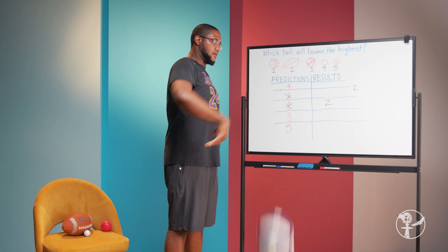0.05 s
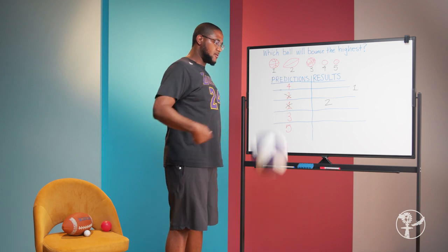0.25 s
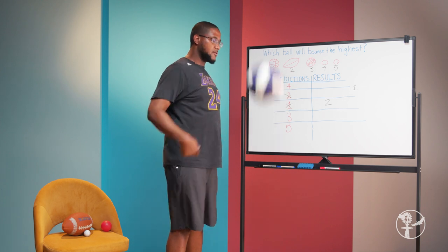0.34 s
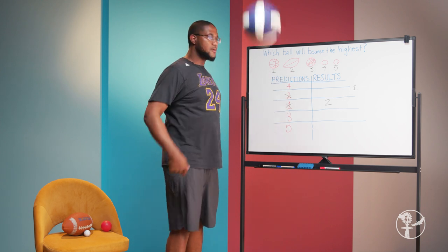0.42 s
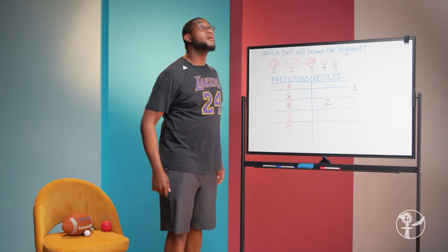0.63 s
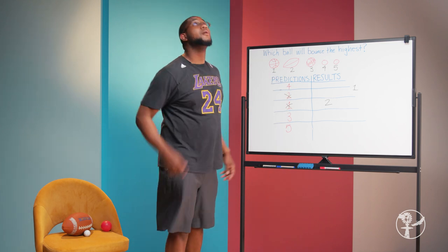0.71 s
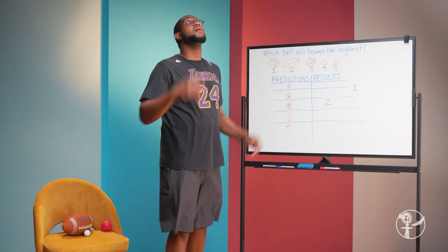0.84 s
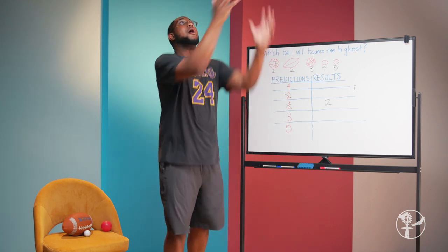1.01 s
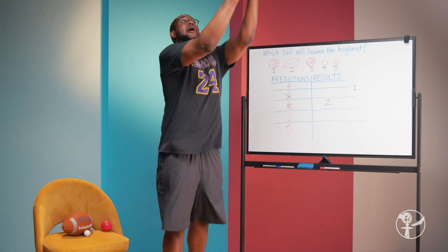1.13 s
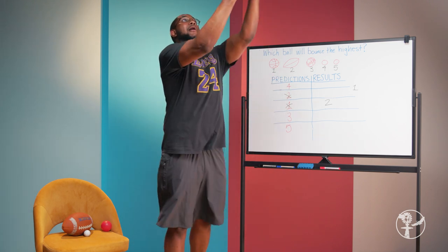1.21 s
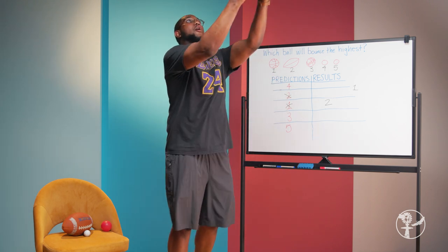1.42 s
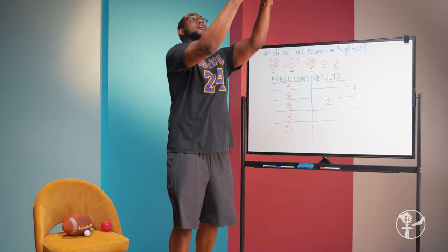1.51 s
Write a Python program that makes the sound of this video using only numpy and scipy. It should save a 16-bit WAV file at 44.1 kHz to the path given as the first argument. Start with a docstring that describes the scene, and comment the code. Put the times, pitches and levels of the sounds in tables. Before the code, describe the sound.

Hard ball bounce with a sharp crack and boomy tail, followed by close clothing rustle and bumps

```python
"""In a large room, a ball is thrown hard onto the floor: a crack, a short hollow thump, then a boomy tail.
The crack and thump are short sine tones; the tail is ringing low tones plus noise dying band by band.
A microphone clipped to a shirt also hears the cloth rustle, snap and bump as the arms move: shaped
grains and noise, clicks and low knocks. Something small and metallic rings faintly: wavering sine tones."""
import sys
import numpy as np
from scipy import signal
from scipy.fft import rfft, irfft
from scipy.io import wavfile

SR = 44100
rng = np.random.default_rng(int(sys.argv[2]) if len(sys.argv) > 2 else 0)


def unload_wav(signal):
    """Save mono or channel-first audio to the path in sys.argv[1] as 16-bit WAV at rate SR, clipped to [-1, 1]."""
    wavfile.write(
        sys.argv[1],
        SR,
        np.round(np.clip(np.atleast_2d(signal).T, -1, 1) * 32767).astype(np.int16),
    )


N = 68355  # length of the scene [samples]
CRACK_S = .2450  # moment the ball hits the floor [s]


def amp(db):
    """Turn decibels into a gain."""
    return 10 ** (np.asarray(db) / 20)


def rms_one(x):
    """Scale a signal to an rms (average strength) of 1."""
    return x / np.sqrt(np.mean(x ** 2) + 1e-20)


def at_hz(points, hz):
    """Read a table of (frequency, value) between its points, on a log-frequency axis."""
    points = np.array(points)
    return np.interp(np.log(hz), np.log(points[:, 0]), points[:, 1])


def since(s):
    """Seconds passed after a moment, zero before it."""
    return np.maximum(np.arange(N) / SR - s, 0)


def band(x, low_hz, high_hz):
    """Keep only the sound between two frequencies."""
    edges = [low_hz, min(high_hz, .45 * SR)]
    return signal.sosfilt(signal.butter(2, edges, "band", fs=SR, output="sos"), x)


def coloured(x, spectrum):
    """Give noise or grains a spectrum, at rms 1."""
    hz = np.maximum(np.fft.rfftfreq(N, 1 / SR), 1)
    return rms_one(irfft(rfft(x) * amp(at_hz(spectrum, hz)), N))


def arch(s, length):
    """A half-sine envelope: up and down again once."""
    return np.sin(np.pi * np.minimum(since(s) / length, 1))


def tone(hz, s):
    """A sine tone that starts at a moment."""
    return np.sin(2 * np.pi * hz * since(s))


def fibres():
    """Cloth fibres catching on each other: dense random clicks of uneven size."""
    per_second, spread_db = 14000, 2.5
    sizes = amp(spread_db * np.minimum(rng.exponential(1, N), 5))
    signs = rng.choice([-1, 1], N)
    happens = rng.random(N) < per_second / SR
    return rms_one(sizes * signs * happens)


def background_noise():
    """A faint steady noise under everything: random noise with a fixed spectrum."""
    # background spectrum, relative: (frequency [Hz], level [dB])
    noise_spectrum = [(15, -38), (25, -28), (161, -10), (335, -23), (607, -35.5), (863, -28), (2550, -37.5),
                      (5430, -35.5), (7510, -45), (11600, -36.5), (16000, -48.5)]
    level_db = -60
    return amp(level_db) * coloured(rng.standard_normal(N), noise_spectrum)


def rustle():
    """Fibres rubbing: hiss, body and rumble follow the movement of the cloth."""
    # movements of the cloth: (time [s], hiss level [dB], body level [dB], rumble level [dB])
    movements = [
        [(0.0, -69.5, -72, -59.5), (0.11, -47.5, -53.5, -47), (0.17, -57, -76, -53), (0.24, -68.5, -84.5, -68)],
        [(0.9, -77, -80, -74), (1.018, -53.5, -71.5, -44.5), (1.078, -46, -52.5, -41.5),
         (1.14, -43, -48.5, -36.5), (1.198, -47, -31.5, -36.5), (1.248, -46.5, -38, -40),
         (1.296, -39.5, -40, -40), (1.388, -53, -42.5, -43), (1.436, -47.5, -45.5, -47.5),
         (1.55, -62.5, -63.5, -68)],
    ]
    # faint hiss of cloth while the ball is in the air: (time [s], level [dB])
    faint_hiss = [(0.24, -71), (0.3, -73), (0.58, -74.5), (0.9, -76.5)]
    # spectrum of the hiss, relative: (frequency [Hz], level per Hz [dB])
    hiss_spectrum = [(1470, -52), (2500, -34), (2770, -27), (3600, -16.5), (5350, -7), (7360, -12.5),
                     (11700, -11), (16000, -23.5)]
    # spectrum of the body, relative: (frequency [Hz], level per Hz [dB])
    body_spectrum = [(180, -48), (300, 0), (467, 4), (545, -2.5), (1120, 5.5), (1320, 2), (1430, 4.5),
                     (2230, -5), (3500, -7), (4550, -36), (7700, -120)]
    hiss = coloured(fibres(), hiss_spectrum)
    body = coloured(fibres(), body_spectrum)
    rumble = rms_one(band(rng.standard_normal(N), 35, 220))
    out, clock = 0, np.arange(N) / SR
    for rows in [*movements, faint_hiss]:
        times, *levels = np.transpose(rows)
        # the faint hiss has one level column, so it uses the first layer only
        for level_db, layer in zip(levels, [hiss, body, rumble]):
            # outside its times a movement is too soft to hear
            out = out + amp(np.interp(clock, times, level_db, left=-120, right=-120)) * layer
    return out


def scuffs():
    """Cloth scuffing across the microphone: bursts of grainy noise that swell, hold, then die."""
    # scuffs: (start [s], rise [s], hold [s], time to fall 60 dB [s], level [dB],
    #          low edge [Hz], high edge [Hz])
    scuff_list = [(0.048, 0.0022, 0.014, 0.36, -41.5, 3240, 15500),
                  (.065, 0.0013, 0.041, 0.22, -49.5, 490, 2800), (.051, .010, .003, .012, -37, 3500, 14000),
                  (.106, .004, .004, .012, -35, 3000, 11000),
                  (1.050, 0.0018, 0.0038, 0.02, -44, 1550, 12500),
                  (1.051, 0.00067, 0.0048, 0.071, -44, 524, 1240),
                  (1.114, 0.002, 0.0021, 0.077, -43, 800, 14300),
                  (1.155, 0.005, 0.0069, 0.074, -31, 2310, 12700),
                  (1.158, 0.0019, 0.0051, 0.052, -28, 650, 1725),
                  (1.169, 0.0028, 0.009, 0.24, -35.5, 2310, 14100),
                  (1.2255, .003, .002, .015, -27, 1500, 9000), (1.2352, .0003, .001, .02, -25, 3000, 15000),
                  (1.2415, .002, .002, .025, -30, 2200, 9000), (1.279, .003, .004, .012, -19, 4500, 15000),
                  (1.280, .002, .005, .012, -21, 3250, 3950), (1.282, .002, .003, .015, -22, 400, 2500),
                  (1.290, .001, .003, .025, -24, 1200, 5500), (1.290, .001, .003, .04, -25, 3250, 3950),
                  (1.306, .004, .003, .05, -34, 2200, 4500), (1.339, .001, .004, .035, -32, 1200, 4200),
                  (1.339, .001, .01, .08, -42, 6500, 9000), (1.289, .003, .02, .1, -39, 6500, 8500),
                  (1.352, 0.0042, 0.0059, 0.03, -45, 251, 610),
                  (1.465, 0.0063, 0.0097, 0.14, -46.5, 3540, 14800)]
    grains = fibres() + 1.44 * rng.standard_normal(N)
    out = 0
    for s, rise, hold, t60, db, low_hz, high_hz in scuff_list:
        swell = np.minimum(since(s) / rise, 1) ** 2
        fade = amp(db - 60 * since(s + rise + hold) / t60)
        # filtered twice for steeper edges
        burst = band(band(grains, low_hz, high_hz), low_hz, high_hz)
        out = out + swell * fade * rms_one(burst)
    return out


def ticks():
    """A seam or button ticking: one click with a short noisy wake, through its own band."""
    # ticks: (time [s], peak level [dB], low edge [Hz], high edge [Hz])
    tick_list = [(.0455, -21, 2800, 16000), (.0645, -23, 500, 3200), (.0777, -24, 600, 4500),
                 (.1128, -24, 3000, 9000), (.292, -46, 6000, 14000), (.507, -46, 2500, 12000),
                 (.770, -45, 1500, 13000), (1.2354, -12, 1500, 15000)]
    wake_t60_s = 0.0031  # time for the wake to fall 60 dB
    noise, out = rng.standard_normal(N), 0
    for s, db, low_hz, high_hz in tick_list:
        wake = noise * (since(s) > 0) * amp(-60 * since(s) / wake_t60_s)
        click = 0.083 * wake + 1e-18
        click[int(s * SR)] = 1
        click = band(band(click, low_hz, high_hz), low_hz, high_hz)
        out = out + amp(db) * click / np.abs(click).max()
    return out


def bumps():
    """Bumps on the microphone body: low tones that start softly and die quickly."""
    # bumps: (time [s], level [dB], pitch [Hz], time to fall 60 dB [s])
    bump_list = [(0.116, -35.5, 102, .1), (1.024, -33, 129, 0.073), (1.049, -17.5, 68.3, 0.079),
                 (1.085, -29, 95, .1), (1.123, -22.5, 89, 0.076), (1.16, -20.5, 249.5, 0.073),
                 (1.174, -27, 135, 0.049), (1.237, -15, 111, 0.036), (1.253, -25.5, 64, 0.16),
                 (1.286, -12, 216, 0.028), (1.318, -29, 106, 0.22), (1.355, -16, 185, 0.029),
                 (1.41, -14, 103, 0.033)]
    out = 0
    for s, db, hz, t60 in bump_list:
        soft_start = np.minimum(since(s) * hz * 2, 1)  # lasts half a cycle
        out = out + amp(db - 60 * since(s) / t60) * soft_start * tone(hz, s)
    return out


def squeaks():
    """Cloth squeaking: noise in narrow bands, swelling and fading once."""
    # squeaks: (start [s], length [s], pitch [Hz], level [dB])
    squeak_list = [(1.18, .05, 1090, -33), (1.405, .035, 950, -43), (1.225, .02, 2000, -36),
                   (1.29, .025, 2020, -39), (1.33, .045, 1080, -42)]
    width_hz = 130
    white, out = rng.standard_normal(N), 0
    for s, length, hz, db in squeak_list:
        squeak = rms_one(band(white, hz - width_hz / 2, hz + width_hz / 2))
        out = out + amp(db) * arch(s, length) * squeak
    return out


def metal_rings():
    """Something small and metallic ringing: thin sine tones of wavering strength."""
    # rings: (start [s], length [s], pitch [Hz], level [dB])
    ring_list = [(.37, .022, 3260, -50), (.45, .115, 3250, -66), (1.285, .125, 5170, -45),
                 (1.4, .06, 5170, -54), (1.33, .09, 5400, -51), (1.49, .06, 5170, -60),
                 (1.288, .06, 7150, -47), (1.338, .03, 8550, -53), (1.335, .03, 7500, -53)]
    waver = 1 + .35 * rms_one(band(rng.standard_normal(N), 15, 90))
    out = 0
    for s, length, hz, db in ring_list:
        out = out + amp(db) * arch(s, length) ** .5 * waver * tone(hz, s)
    return out


def room_modes():
    """The bounce sets the room ringing at its own pitches; the low ones build up a little later."""
    # room modes: (pitch [Hz], level [dB], time to fall 60 dB [s])
    mode_list = [(72.2, -29.5, 1.0), (100.83, -5, 0.44), (107.7, -15, 1.12), (125.5, -17.5, 0.83),
                 (138.85, -6, .7), (154.2, -21, 0.96), (165.6, -16, 1.143), (193.5, -18, 1),
                 (204.5, -14.5, 0.23), (246, -22, 0.73), (269, -17.5, 0.66), (328, -44, .6),
                 (449, -31, 0.72), (463, -24, 0.57), (569, -26, 0.2), (738.5, -26, 0.51),
                 (843, -36.5, 0.69), (1022, -47.5, 0.24)]
    build_s, build_delay_s, delayed_below_hz = .018, .028, 400
    waver_depth = .3
    t = since(CRACK_S)
    build = 1 - np.exp(-since(CRACK_S + build_delay_s) / build_s)
    out = 0
    for hz, db, t60 in mode_list:
        waver = 1 + waver_depth * rms_one(band(rng.standard_normal(N), 2, 12))
        start = build if hz < delayed_below_hz else 1
        out = out + start * waver * amp(db - 60 * t / t60) * tone(hz, CRACK_S)
    return out


def diffuse_tail():
    """Blurred echoes of the bounce: noise dying band by band, the lows rising more slowly."""
    # tail spectrum, relative: (frequency [Hz], level per Hz [dB])
    tail_spectrum = [(50, -34), (80, -16), (110, -27), (150, -3), (200, -18.5), (286, -13.5), (385, -32.5),
                     (452, -22.5), (750, -23.5), (1130, -25.5), (1700, -28.5), (2100, -35), (2500, -44),
                     (3300, -42.5), (5200, -51), (7500, -71.5), (12000, -68.5)]
    # how long the tail lasts: (frequency [Hz], time to fall 60 dB [s])
    tail_decay = [(60, 2.2), (160, 0.82), (420, 0.55), (1100, 0.42), (2910, 0.24), (7680, 0.15)]
    level_db = -26.5  # strength averaged from the start of the scene to 0.1 s after the hit, silence before the hit included
    rise_s, extra_rise_at_150_hz_s = 0.00067, 0.029
    hold_s = 0.14  # the fall starts gently over about this long
    t = since(CRACK_S)
    held_t = np.hypot(t, hold_s) - hold_s
    edges = 50 * 2 ** np.arange(0, 8.1, 1 / 3)  # bands a third of an octave wide
    white = rng.standard_normal((2, N))  # neighbouring bands use different noise
    tail = 0
    for k, (low, high) in enumerate(zip(edges, edges[1:])):
        hz = np.sqrt(low * high)
        noise = band(band(white[k % 2], low, high), low * 0.76, high * 1.7)
        rise = 1 - np.exp(-(t / (rise_s + extra_rise_at_150_hz_s * (150 / hz) ** 2)) ** 2)
        fade = amp(at_hz(tail_spectrum, hz) - 60 * held_t / at_hz(tail_decay, hz))
        tail = tail + noise * fade * rise
    return amp(level_db) * tail / np.sqrt(np.mean(tail[t < .1] ** 2))


def crack():
    """The ball's skin cracks on the floor: a very short tone with duller and brighter knocks."""
    # other modes of the skin: (pitch [Hz], level [dB], time to fall 60 dB [s])
    skin_modes = [(487, -9.5, .02), (910, -11.5, 0.014), (1210, -5.5, 0.0083), (2200, -12, 0.0058)]
    level_db, pitch_hz, t60_s = 1, 1650, .005
    t = since(CRACK_S)
    snap = amp(level_db - 60 * t / t60_s) * tone(pitch_hz, CRACK_S)
    snap = snap * (1 - np.exp(-(t / .0008) ** 2))  # soft start
    knocks = sum(amp(db - 60 * t / t60) * tone(hz, CRACK_S) for hz, db, t60 in skin_modes)
    knocks = knocks * (1 - np.exp(-(t / .001) ** 2))
    return snap - knocks


def thump():
    """Ball and floor thump while they touch: a few cycles of a low tone under one arch."""
    start_s, length_s, level_db, pitch_hz = .2463, .0205, 0, 147
    shape = arch(start_s, length_s) ** .7  # a power below 1 makes the arch fuller
    return -amp(level_db) * shape * tone(pitch_hz, start_s)


def scene():
    """Add all sources together at one microphone."""
    cloth = rustle() + scuffs() + ticks() + bumps() + squeaks()
    room = room_modes() + diffuse_tail()
    bounce = crack() + thump()
    return (background_noise() + cloth + metal_rings() + room + bounce)[None]


def record(dry):
    """The microphone loses the deepest bass and softens the top; peaks are rounded, the top is cut."""
    low_hz, soft_hz, cutoff_hz = 28, 13500, 15700
    peak_limit = 1.0
    x = signal.sosfilt(signal.butter(1, [low_hz, soft_hz], "band", fs=SR, output="sos"), dry)
    rounded = x / (1 + np.abs(x / peak_limit) ** 6) ** (1 / 6)
    return signal.sosfilt(signal.ellip(10, .5, 70, cutoff_hz, fs=SR, output="sos"), rounded)


dry = scene()
out = record(dry)
unload_wav(out)
```